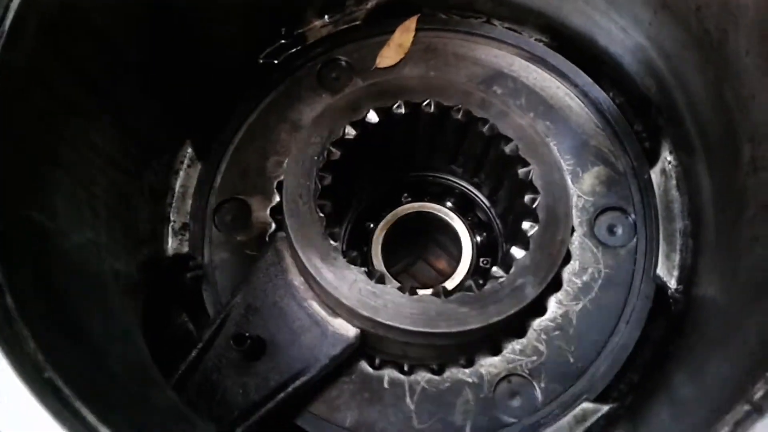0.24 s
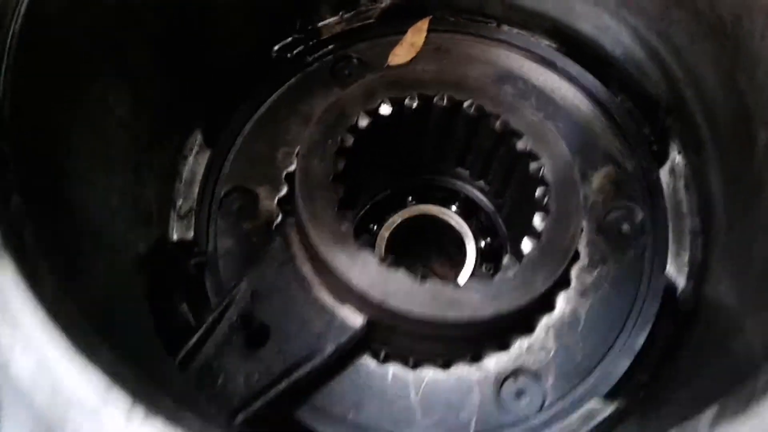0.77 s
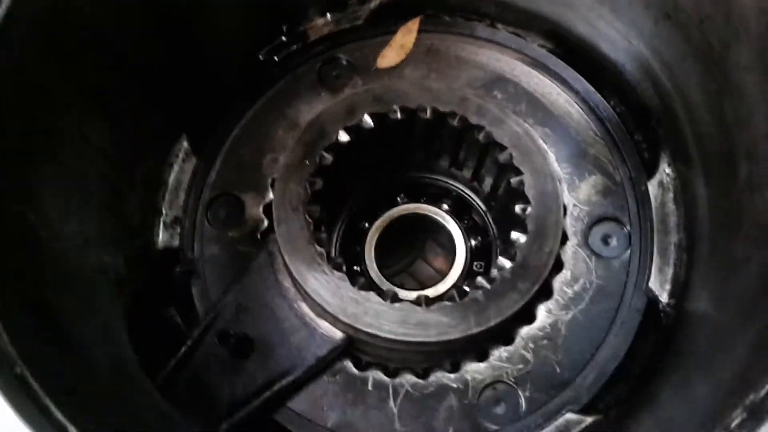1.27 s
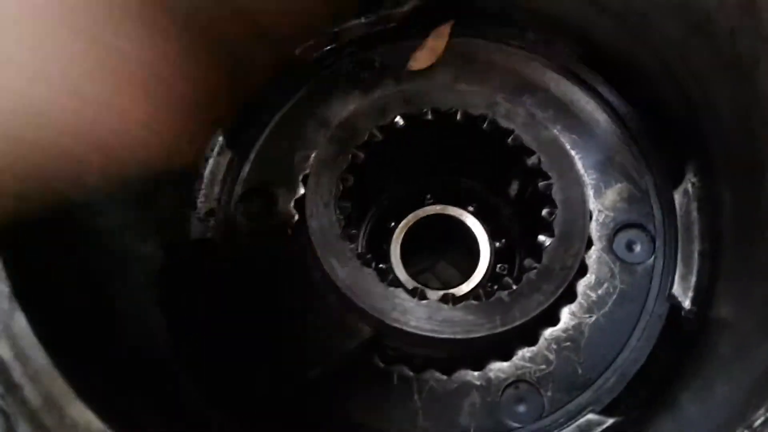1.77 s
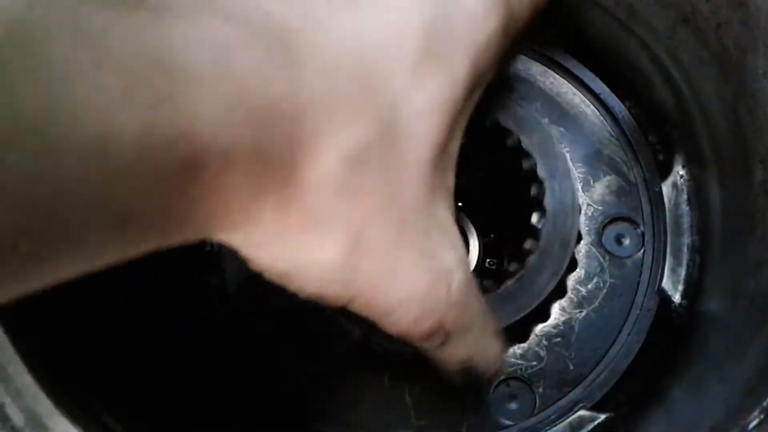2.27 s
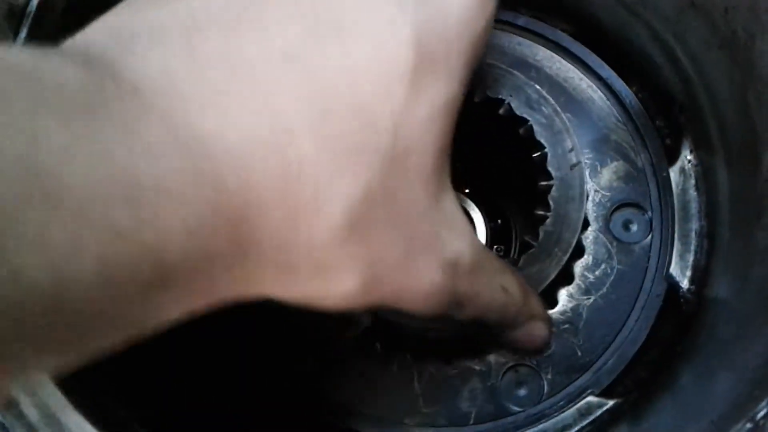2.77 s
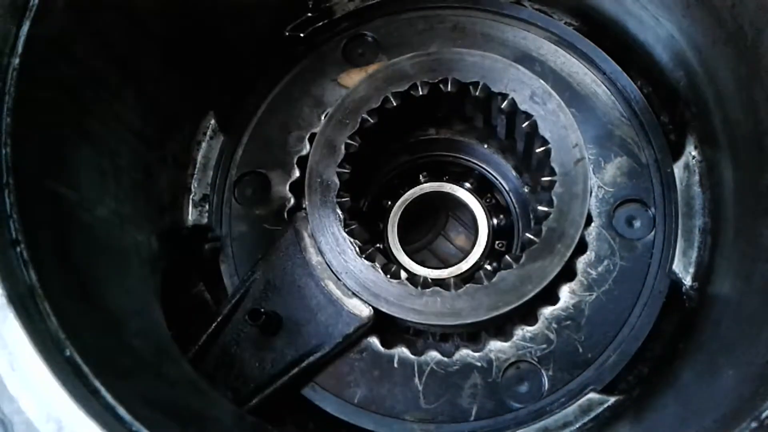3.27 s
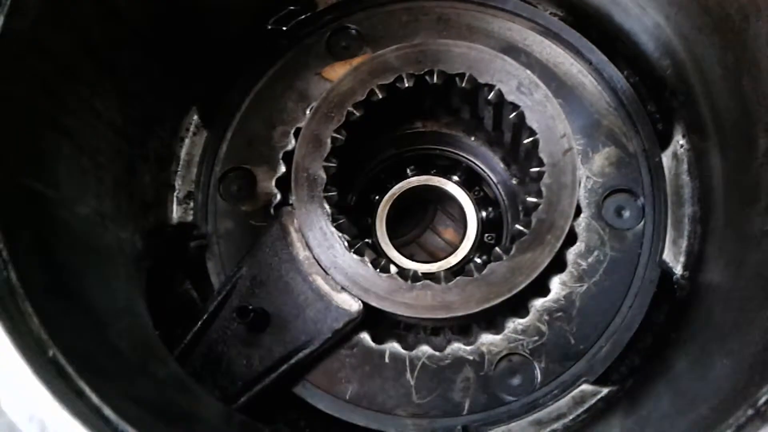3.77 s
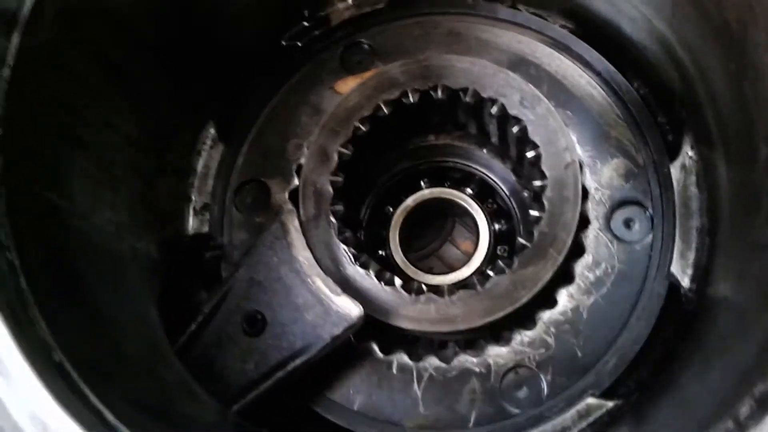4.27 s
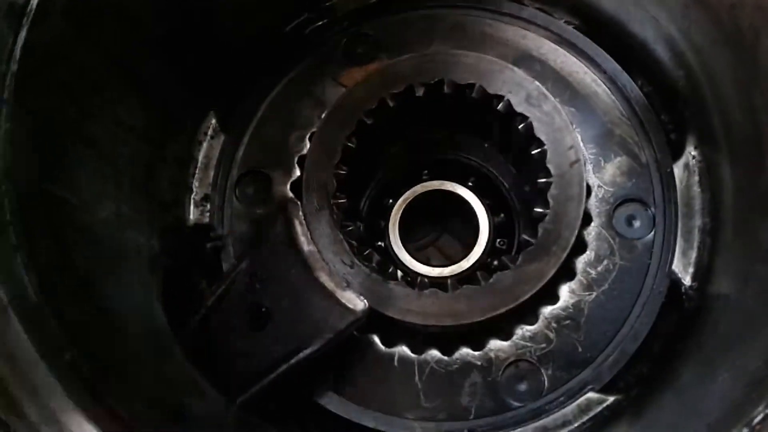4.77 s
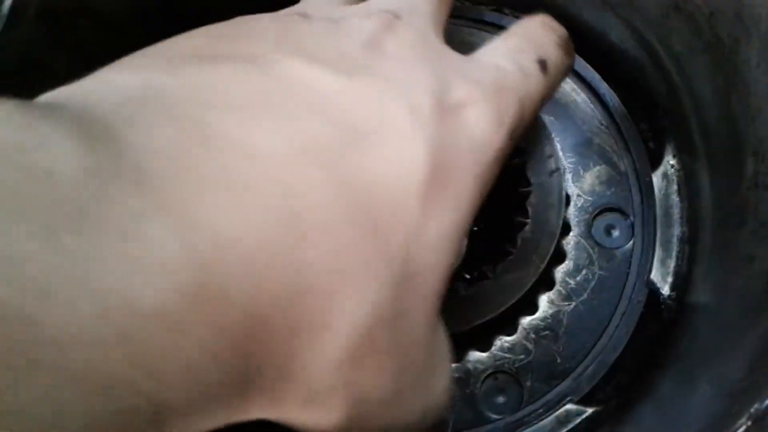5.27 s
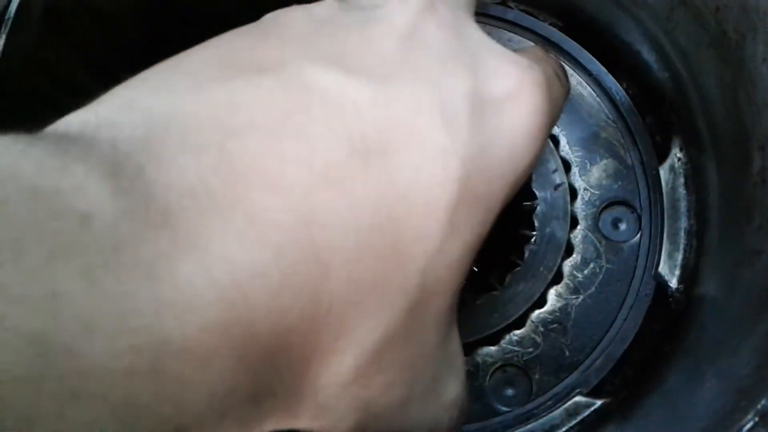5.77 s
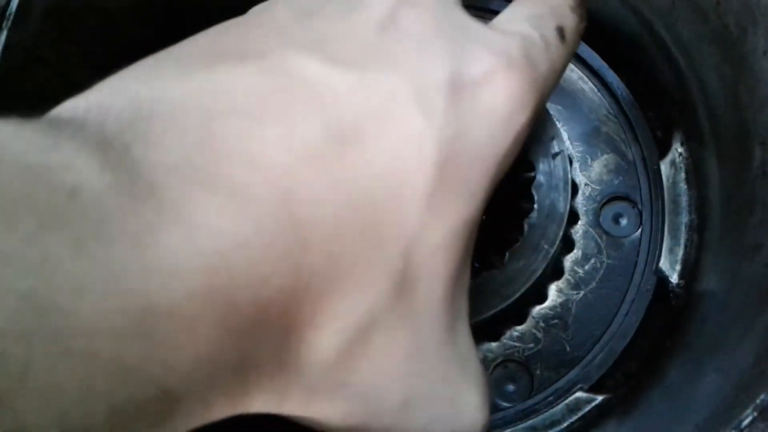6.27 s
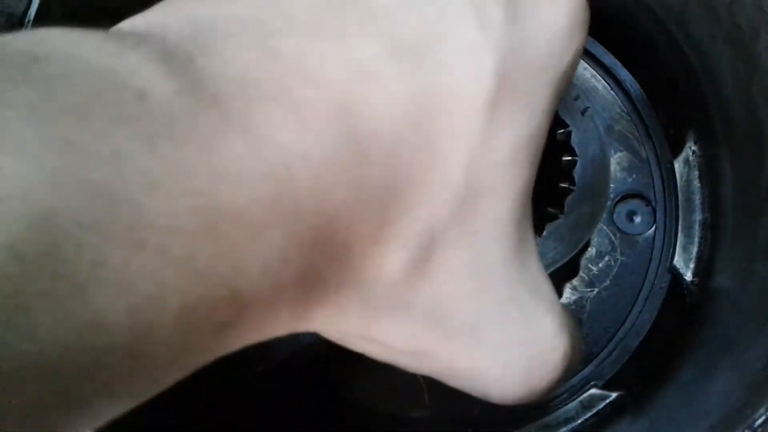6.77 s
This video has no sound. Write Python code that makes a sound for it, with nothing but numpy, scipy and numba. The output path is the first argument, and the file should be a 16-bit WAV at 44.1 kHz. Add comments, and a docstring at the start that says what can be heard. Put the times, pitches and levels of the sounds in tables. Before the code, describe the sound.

Steel gear teeth click and clank inside a deep metal casing, heard very close. Faint ticks come first, then a heavy hollow knock near one second, a bright cluster, and denser clanks as the hand turns the gear. After a pause, more hard hits follow, then sparse knocks and a final rattling flurry with a thin metallic ring. Low workshop hum and faint crickets lie behind. The right side is clear; the left is muffled, as if covered.

```python
"""Steel gear in a metal housing

A hand turns a steel gear in a deep metal housing, heard close above by two ports, the left one covered.
Teeth clink and scrape: bursts and streams of tiny contacts excite damped gear modes and a direct crack.
Softened knocks excite the deep modes of the housing; a loose ring sings as a beating group of modes.
Behind lie the filtered noise of a workshop, its hum, far crickets as throbbing tones, and port hiss.
"""
import sys
import numpy as np
from scipy import signal
from scipy.fft import rfft, irfft, next_fast_len
from scipy.io import wavfile
from scipy.ndimage import uniform_filter1d
from numba import njit

SR = 44100
rng = np.random.default_rng(int(sys.argv[2]) if len(sys.argv) > 2 else 0)


def master(y):
    """Save y as 16-bit WAV."""
    cut = np.clip(np.atleast_2d(y).T, -1, 1)
    pcm = np.round(cut * 32767)  # scale
    wavfile.write(sys.argv[1], SR, pcm.astype(np.int16))


def convert_level_to_amplitude(level_db):
    """Map a level in decibels to its linear amplitude factor."""
    exponent = np.asarray(level_db, float) / 20
    return 10 ** exponent


N = 310271

# All levels in the tables are relative; contact lengths are held to 0.3-12 ms when used.
# teeth meeting: (time [s], level [dB], tilt [dB per octave], air level [dB], chatter length [ms])
# tilt: positive is hard and bright, negative is dull
CLINKS = [(0.2606, -37.5, 4, -78, 4.6), (0.3143, -26.5, -3, -76, 14), (.3259, -24, -4.5, -64, 3.7),
          (.3324, -17.5, 3.5, -51, 4.1), (0.9574, -18, -2, -57.5, 5.4), (1.1235, -33, 1, -63.5, 1.1),
          (1.2366, -43, -9, -71, 12.5), (1.2522, -16.5, 2, -38.5, 6.8), (1.2678, -10.5, 4.5, -45, 3.8),
          (1.2786, -17.5, 0, -44, 2.3), (1.3174, -28.5, -1, -66, 2.5), (1.3384, -30, 1, -76, 0.82),
          (1.3563, -34.5, -1, -79, 1.4), (1.363, -28.5, 4.5, -79, 4.6), (1.5404, -35, -8, -67, 11),
          (2.0343, -37, -2, -56, 1.4), (2.1036, -34, 2, -62, 3), (2.1172, -32.5, 1, -52, 5.5),
          (2.2884, -31, -4, -71, 3.5), (2.3193, -18, -1.5, -51.5, 1.7), (2.3427, -42, 15, -51.5, 5.6),
          (2.4449, -6, -2, -43.5, 2.7), (2.453, -26.5, 11.5, -54, 4.5), (2.523, -9.5, 0.5, -52, 3),
          (2.5483, -9, -2.5, -47, 3.6), (2.5589, -9.5, 0.5, -58, 3.3), (2.5708, -32, 6, -54, 1.7),
          (2.6887, -12, -5, -58, 3.7), (2.7, -16, 2, -63, 4.1), (2.7248, -30.5, -9.5, -63, 1.5),
          (3.6641, -24.5, 7, -53, 0.61), (3.7033, -31, -1, -76, 7.3), (3.8721, -22.5, -4.5, -75, 3.4),
          (3.93, -5, 3, -32.5, 4.5), (3.98, -29, -1, -64, 6.3), (4.022, -33.5, 1, -81, 0.89),
          (4.221, -31, -2, -73, 6.8), (4.241, -17, -2.5, -75, 2.2), (4.2502, -20, 0.5, -72, 1.7),
          (4.3093, -7, 3, -46, 3.6), (4.3226, -10.5, 2.5, -37, 4.5), (4.5366, -31, 3, -70, 4.8),
          (4.7647, -18.5, -11.5, -59, 3.1), (4.7687, -9, -3, -90, 5), (4.787, -23.5, 1, -63, 6.1),
          (5.1581, -43, 2.5, -75, 1.7), (5.5077, -37, -1.5, -68, 2.6), (5.5682, -11, -0.5, -64, 4.2),
          (5.5792, -24.5, -2, -74, 1.1), (6.2409, -13.5, 1.5, -38.5, 3.9), (6.2862, -12.5, -0.5, -46, 1.8),
          (6.3034, -46, -1, -66, 1), (6.4772, -25, -2, -67, 6), (6.4921, -22, 0, -64, 3.2),
          (6.5116, -15.5, 1.5, -53, 1.3), (6.524, -34, -5, -65, 1.6), (6.5391, -21, -7.5, -65, 1.7),
          (6.553, -18, 1, -71, 3.3), (6.5623, -14, -2.5, -71, 6.1), (6.5734, -23.5, -2.5, -76, 3.3),
          (6.5994, -47, 1, -76, 2.8), (6.6126, -45, -8, -79, 3.8), (6.6488, -24.5, 1, -60, 0.77),
          (6.691, -45.5, -7.5, -80, 10), (6.8055, -43.5, -7, -74, 1.6), (6.812, -34, -4.5, -77, 1.3),
          (7.003, -43.5, -4.5, -73, 3.3), (7.0294, -36, -5, -74, 5.9)]
# teeth dragging over each other:
# (start [s], length [s], level [dB], tilt [dB per octave], rumble level [dB])
SCRAPES = [(1.246, 0.032, -37, 3, -32.5), (1.338, 0.03, -44.5, 6, -42.5), (2.375, 0.028, -36, -12, -27.5),
           (2.42, 0.018, -27, 3, -57), (2.518, 0.023, -51, -15.5, -32), (2.546, 0.013, -20.5, 11, -49),
           (2.689, 0.039, -32, 7, -34.5), (3.866, 0.038, -36.5, 1, -35), (3.901, 0.02, -30, -2.5, -45),
           (3.928, 0.043, -45.5, -5, -63), (5.607, 0.064, -63.5, -10.5, -48),
           (6.406, 0.13, -44.5, 0, -42.5), (6.482, 0.11, -34.5, 19, -47), (6.592, 0.038, -57, -1, -50)]
# modes of the gear: (frequency [Hz], level [dB], decay time t60 [s])
GEAR_MODES = [(698, -1, 0.014), (744, -21, 0.1), (955.7, -2, 0.03), (1146, -1, 0.027), (1293, -12.5, 0.028),
              (1603, -13.5, 0.032), (1647, -7.5, 0.029), (1819, -4.5, 0.053), (1923, -15.5, 0.076),
              (2200, -2, 0.021), (2680, -5.5, 0.029), (2910, 4, 0.012), (3198, -1, 0.038),
              (3292, 2.5, 0.036), (3385, 5.5, 0.01), (3758, -1.5, 0.032), (3993, -5, 0.1),
              (4100, -1, 0.031), (4258, 1, 0.045), (4280, 2, 0.013), (5150, -6.5, 0.024)]
# spans in which the hand turns the gear itself; at other times the blows come
# through the shaft and ring less: (start [s], end [s])
HELD_SPANS = [(2.2, 2.9), (5.3, 7.04)]
# the housing knocked: (time [s], level [dB], knock length [ms], pitch [Hz])
THUDS = [(0.068, -42.5, 3.7, 210), (0.313, -26, 2.1, 490), (0.33, -24.5, 4.1, 465),
         (0.955, -10.5, 5.1, 298), (0.961, -3, 1.87, 213), (1.267, -13, 0.84, 200),
         (1.281, -22.5, 1.5, 274), (1.294, -31, 7.9, 296), (1.54, -21, 1.8, 480), (2.028, -31.5, 4, 298),
         (2.056, -37.5, 1.7, 450), (2.219, -40, 4.1, 234), (2.267, -31.5, 5, 439), (2.286, -27, 4.3, 216),
         (2.318, -19.5, 4.8, 468), (2.441, -19.5, 8.8, 460), (2.567, -24, 3.3, 450), (2.686, -18, 3.9, 465),
         (3.448, -38, 7.4, 244), (3.661, -34.5, 7.2, 210), (3.709, -32, 2.3, 214), (3.854, -20.5, 3.8, 208),
         (3.927, -19.5, 4.7, 191), (3.961, -19.5, 3.5, 490), (4.012, -10.5, 10.4, 252),
         (4.036, -34, 5, 315), (4.24, -20, 6.3, 515), (4.317, -17, 1.8, 452), (4.341, -17, 4.5, 210),
         (4.685, -36.5, 15, 278), (4.761, -14.5, 8.6, 342), (5.155, -37, 3.7, 213), (5.207, -43, 4.3, 199),
         (5.505, -30.5, 3.8, 234), (5.567, -30, 9.3, 285), (5.767, -37.5, 1.9, 440),
         (5.844, -37.5, 6.8, 143), (6.241, -20.5, 8.1, 196), (6.287, -21, 4.1, 455), (6.306, -28, 2.8, 433),
         (6.51, -26.5, 6.5, 415), (6.56, -16, 2, 466), (6.649, -27, 2.7, 452), (6.692, -29, 2.7, 320),
         (6.802, -26, 7, 218), (7.004, -29, 4.4, 431)]
# modes of the housing: (frequency [Hz], level [dB], decay time t60 [s])
HOUSING_MODES = [(102, -10.5, 0.7), (120.8, -18.5, 0.41), (155.4, -8, 0.071), (173.4, -13, 0.12),
                 (210, 1.5, 0.11), (236, -2.5, 0.15), (285, 2, 0.092), (315, -3.5, 0.22),
                 (367.6, -3.5, 0.11), (415, 4, 0.068), (452, 3.5, 0.08), (536, -13.5, 0.26),
                 (701, -9, 0.11)]
# the loose ring struck: (time [s], level [dB], level of its high mode [dB])
RING_STRIKES = [(0.2723, -48, -84), (1.2366, -38, -86), (1.288, -53, -73), (2.291, -38, -77),
                (2.374, -30, -71), (2.4575, -33, -57), (2.5526, -47, -62), (2.6932, -42, -62.5),
                (5.5702, -12, -91), (5.8156, -46.5, -80), (5.928, -50, -84), (6.1677, -50, -89),
                (6.2455, -56, -74), (6.2892, -19.5, -66), (6.512, -34, -64), (6.541, -3.5, -79),
                (6.5514, -22, -79), (6.5811, -22, -74), (6.6478, -34, -67.5)]
# modes of the ring, the high one last: (frequency [Hz], level [dB], decay time t60 [s])
RING_MODES = [(4151.5, 0, .44), (4159.8, -6.5, .44), (4242, -18, .15), (10865, 7.5, .2)]
# fingers or teeth damp the ring: (time [s], level taken [dB])
GRIPS = [(.3, 11), (1.4, 13), (2.318, 14), (2.42, 10), (2.513, 25), (2.601, 20), (2.763, 19), (5.754, 9.5),
         (6.312, 13), (6.7, 21)]
# the rim struck: (time [s], level [dB])
RIM_STRIKES = [(1.266, -71), (3.9275, -52.5)]
# the one mode of the rim: (frequency [Hz], decay time t60 [s])
RIM_MODE = (11060, 0.31)
# response of the microphone: (frequency [Hz], gain [dB])
MIC_RESPONSE = [(20, -61), (60, -8), (110, 0.5), (4800, -2.5), (7000, -32.5), (12000, -43)]
# transfer through the covered left port: (frequency [Hz], gain [dB], phase [rad])
COVER_RESPONSE = [(40, -2.5, -.4), (90, -2, -.6), (215, -5, -1.0), (300, -7.5, -1.0), (430, -6, -.9),
                  (600, -12, -.9), (860, -19, -.9), (1200, -23, .1), (1700, -32, 1.0), (3000, -45, 1.0)]
# colour of what rattles round the cover: (frequency [Hz], gain [dB])
LEAK_COLOUR = [(100, -45), (300, -24), (600, -17), (900, -21), (1700, -29), (2400, -36), (3400, -39),
               (4300, -38), (6500, -32), (9000, -22), (15000, -14)]
# far crickets trilling: (start [s], length [s], mid-trill pitch [Hz], level [dB])
TRILLS = [(-.3, 0.79, 3630, -63), (1.7, 0.63, 3680, -48.5), (3.1, 0.71, 4040, -60.5), (3.3, .7, 3780, -61),
          (4.25, 0.42, 3710, -55), (5.15, .75, 3770, -55)]
# spectrum of the workshop air: (frequency [Hz], density [dB per Hz])
SHOP_SPECTRUM = [(18, -43.5), (30, -30), (51, -14.5), (129, -6.5), (171, -16.5), (350, -17), (386, -21.5),
                 (467, -23), (526, -24), (734, -23), (2200, -23), (4000, -22), (5320, -32.5), (9000, -54.5),
                 (11700, -72), (19800, -120)]
# self-noise of each port: (frequency [Hz], density [dB per Hz])
HISS_SPECTRUM = [(1000, -116), (4300, -118), (8000, -115), (11000, -118), (15000, -115)]
# level of shop and hiss, which steps up near the first loud blow and wavers after: (time [s], level [dB])
SWELL = [(0, -4.5), (.94, -5), (1.0, 3), (1.4, 4.5), (2.6, 5.5), (2.9, 0), (3.6, -0.5), (4.0, 3.5),
         (5.0, 4), (7.04, 2.5)]

TILT_HZ = 2800  # pivot of the spectral tilt


def teeth(drag_bright, drag_middle):
    """Impact excitation: contacts and drags feed the gear modes and radiate directly as a crack."""
    s, db, tilt_db, air_db, ms = np.transpose(CLINKS)
    blows = chatter(ms, 0.91, first=0.3)

    def tilted_db(hz):
        """Spectral tilt: the level changes by a fixed amount per octave from the pivot."""
        return db + tilt_db * np.log2(hz / TILT_HZ)

    # (low edge [Hz], high edge [Hz], blow levels [dB], drag signal)
    zones = [(468, 1900, tilted_db(837), drag_middle),
             (2233, 3460, db + 1.5, drag_bright),
             (3880, 6430, tilted_db(5500), drag_bright)]
    mode_zones = [zones[(hz > 2200) + (hz > 3500)] for hz, _, _ in GEAR_MODES]
    held = sum((a < s) & (s < b) for a, b in HELD_SPANS)
    ringing_db = np.where(held, -5, -13)
    levels_db = [zone[2] + ringing_db for zone in mode_zones]
    streams = [convert_level_to_amplitude(-22.5) * zone[3] for zone in mode_zones]
    out = body(GEAR_MODES, s, blows, levels_db, streams, scatter_db=3)
    for lo_hz, hi_hz, level_db, drag in zones:
        contacts = place(s, blows * convert_level_to_amplitude(level_db + 25.5)[:, None])
        out = out + band(contacts + convert_level_to_amplitude(-6) * drag, lo_hz, hi_hz)
    return out


def drags():
    """Sliding friction: streams of uneven contacts for the bright, middle and low part of each scrape."""
    s, length, db, tilt_db, rumble_db = np.transpose(SCRAPES)[:, :, None]
    lead_s, rise_db_s, fall_db_s = 0.04, 2504, 1208  # a drag bites, holds, lets go
    t = np.arange(SR // 4) / SR - lead_s
    bite_db = np.minimum(0, rise_db_s * t)
    release_db = np.maximum(0, fall_db_s * (t - length))
    middle_db = db + tilt_db * np.log2(1000 / TILT_HZ)
    levels = [place(s[:, 0] - lead_s, convert_level_to_amplitude(level_db + bite_db - release_db))
              for level_db in (db, middle_db, rumble_db)]
    return np.array(levels) * grit((3, N), 2.3) * convert_level_to_amplitude(2.08 * walk(120))


def housing(drag):
    """Soft impacts lack treble: dull knocks excite the casing modes, most of all those near their pitch."""
    s, db, ms, pitch_hz = np.transpose(THUDS)
    soft = signal.lfilter(np.hanning(60) / 30, 1, chatter(ms, 2.0, first=1.4))
    s = s + 0.0014  # the knocks sound 1.4 ms after their listed times
    levels_db = [db - 4.0 - 5.75 * np.abs(np.log2(hz / pitch_hz)) for hz, _, _ in HOUSING_MODES]
    rumble = convert_level_to_amplitude(-28) * band(drag, 90, 780)
    ringing = body(HOUSING_MODES, s, soft, levels_db, [rumble] * len(HOUSING_MODES), scatter_db=1.47)
    direct = band(place(s, soft * convert_level_to_amplitude(db + 34.5)[:, None]), 130, 650)
    return ringing + direct


def ring():
    """Beating: close modes of the loose ring drift in and out of phase until a grip adds damping."""
    s, low_db, high_db = np.transpose(RING_STRIKES)
    grip_s, taken_db = np.transpose(GRIPS)
    # a new blow first stills the old song
    damp_s = np.r_[grip_s, s - .005]
    damp_db = np.r_[taken_db, np.full(len(s), 12.0)]
    hold = convert_level_to_amplitude(-place(damp_s, np.outer(damp_db, np.ones(200) / 200)))  # loss spread over 200 samples
    out = []
    for k, (hz, db, t60) in enumerate(RING_MODES):
        # a smooth tap at the mode's own pitch, so the ring swells in without a click
        tap = np.hanning(100) / 25 * np.cos(2 * np.pi * hz * np.arange(100) / SR)
        strike_db = low_db if hz < 9000 else high_db
        taps = place(s, np.outer(convert_level_to_amplitude(strike_db), tap))
        out.append((-1) ** k * convert_level_to_amplitude(db) * mode(taps, float(hz), t60, hold))
    return sum(out[:-1]), out[-1]


def sparks():
    """Short contacts reach high frequencies: the thin top of the clinks, and a rim struck into song."""
    s, air_db, ms = np.transpose(CLINKS)[[0, 3, 4]]
    contacts = place(s, chatter(ms, 2.5, first=0.5) * convert_level_to_amplitude(air_db + 25.5)[:, None])
    air = shape(contacts, [(3000, -34.5), (6000, 15.5), (9000, 0.5), (12000, -10.5), (16000, -16.5)])
    s, db = np.transpose(RIM_STRIKES)
    hz, t60 = RIM_MODE
    return air + mode(place(s, convert_level_to_amplitude(db)[:, None]), float(hz), t60, np.ones(N))


def chatter(ms, spread_db, first):
    """Repeated impact: a sharp contact within a lump of tiny ones that swells and dies; energy about 1."""
    t = np.arange(1800) / SR * 1000 / np.clip(ms, .3, 12)[:, None]  # in contact lengths
    lump = grit(t.shape, spread_db) * t ** .3 * np.exp(-t ** 1.4)
    lump /= np.sqrt(np.sum(lump ** 2, axis=1, keepdims=True))
    lump[:, 12] += first
    return lump / np.sqrt(1 + first ** 2)


def grit(size, spread):
    """Surface roughness: tiny contacts of very uneven size, rms 1."""
    g = rng.standard_normal(size) * convert_level_to_amplitude(spread * rng.exponential(size=size))
    return g / np.sqrt(np.mean(g ** 2))


def body(modes, s, blows, levels_db, streams, scatter_db):
    """Modal superposition: every blow lands elsewhere and so excites another mix of the modes."""
    spot = rng.standard_normal((len(s), len(modes)))
    out = 0
    for k, (hz, db, t60) in enumerate(modes):
        gain = convert_level_to_amplitude(levels_db[k] + scatter_db * spot[:, k])[:, None]
        drive = place(s, blows * gain) + streams[k]
        out = out + (-1) ** k * convert_level_to_amplitude(db) * mode(drive, float(hz), t60, np.ones(N))
    return out


@njit
def mode(x, hz, t60, hold):
    """Damped resonance as a rotating, shrinking phasor; hold under 1 takes extra energy out."""
    pole = np.exp((2j * np.pi * hz - np.log(1000) / t60) / SR)
    z, y = 0j, np.empty(len(x))
    for i in range(len(x)):
        z = z * pole * hold[i] + x[i] + 1e-18
        y[i] = z.imag
    return y


def tail(t60, points):
    """Diffuse reverberation: exponentially decaying noise of the given colour."""
    t = np.arange(SR // 2) / SR
    return shape(rng.standard_normal(len(t)) * np.exp(-np.log(1000) * t / t60), points)


def covered(x):
    """Transmission through a cover: mostly bass, lagging in phase, plus a smeared leak round it."""
    hz, db, rad = np.transpose(COVER_RESPONSE)
    size = next_fast_len(N + 4096)
    f = np.log(np.maximum(np.fft.rfftfreq(size, 1 / SR), 1))
    gain = convert_level_to_amplitude(np.interp(f, np.log(hz), db))
    turn = np.exp(1j * np.interp(f, np.log(hz), rad))
    through = irfft(rfft(x, size) * gain * turn, size)[:N]
    leak = signal.fftconvolve(x, convert_level_to_amplitude(-17) * tail(.015, LEAK_COLOUR))[:N]
    return through + leak


def shape(x, points):
    """Minimum-phase filter from the folded cepstrum of a gain curve of (frequency [Hz], gain [dB])."""
    hz, db = np.transpose(points)
    f = np.maximum(np.fft.rfftfreq(4096, 1 / SR), 1)
    c = irfft(np.interp(np.log(f), np.log(hz), db) * np.log(10) / 20)
    c[1:2048] *= 2
    c[2049:] = 0
    return signal.fftconvolve(x, irfft(np.exp(rfft(c))))[:N]


def band(x, lo_hz, hi_hz):
    """Butterworth band-pass: a passband without ripple between two edges."""
    return signal.sosfilt(signal.butter(2, [lo_hz, hi_hz], "band", fs=SR, output="sos"), x)


def place(s, shapes):
    """Linear superposition: one row of samples is added at each time."""
    at = (np.asarray(s) * SR).astype(int)[:, None] + np.arange(shapes.shape[1])
    return np.bincount(at.ravel(), shapes.ravel(), N + shapes.shape[1])[:N]


def curve(rows):
    """Linear interpolation of table columns in time, one value per sample."""
    s, *columns = np.transpose(rows)
    return [np.interp(np.arange(N) / SR, s, c) for c in columns]


def walk(rate):
    """Low-pass random fluctuation with a spread near 1, from rate chance values a second."""
    k = int(SR / rate)
    steps = np.repeat(rng.standard_normal(N // k + 1), k)
    return 1.6 * uniform_filter1d(uniform_filter1d(steps, k), k)[:N]


def crickets():
    """Amplitude modulation: narrow throbbing tones blurred by distance, each swelling, climbing, fading."""
    t, out = np.arange(N) / SR, 0
    climb_hz_s = 101.5
    for s, length, hz, db in TRILLS:
        pulse = np.sin(2 * np.pi * 40 * t + 1.14 * walk(7.1))  # 40 Hz
        throb = np.clip(pulse + 0.33, 0, 1) * (1 + 0.76 * walk(150))
        swell = np.sin(np.pi * np.clip((t - s) / length, 0, 1)) ** 2
        pitch_hz = hz + climb_hz_s * (t - s - length / 2) + 25 * walk(10)
        out = out + convert_level_to_amplitude(db) * swell * throb * np.sin(2 * np.pi * np.cumsum(pitch_hz) / SR)
    return out


def shop():
    """Filtered noise: workshop air whose low hum wavers more than the rest."""
    air = shape(rng.standard_normal(N), SHOP_SPECTRUM) * convert_level_to_amplitude(-26.5)
    hum = band(air, 47, 330)
    return air + hum * (convert_level_to_amplitude(1.0 * walk(33)) - 1)


def hiss():
    """Self-noise: shaped noise of one port, scaled from density per Hz to full bandwidth."""
    return shape(rng.standard_normal(N), HISS_SPECTRUM) * np.sqrt(SR / 2)


def scene():
    """Superposition of dry blows, their reverberation in housing and shop, and the background."""
    bright, middle, low = drags()
    song, overtone = ring()
    steel = teeth(bright, middle) + housing(low)
    rattle = tail(0.12, [(300, -42), (700, -30), (1500, -30.0), (3000, -37.5), (5000, -35.5)])
    room = tail(0.58, [(60, -61.5), (130, -35), (300, -47), (700, -55), (3000, -84.0)])
    echoes = signal.fftconvolve(steel, rattle + room)[:N]
    # the highest parts bypass the microphone curve
    gear = shape(steel + song + echoes, MIC_RESPONSE) + overtone + sparks()
    swell = convert_level_to_amplitude(curve(SWELL)[0])
    near = gear + swell * shop() + crickets()
    noises = [hiss() * swell for _ in range(2)]
    return np.array([covered(near), near]) + noises


def top_cut(x):
    """Nothing passes above the cut-off."""
    return signal.sosfilt(signal.butter(12, 15900, fs=SR, output="sos"), x)


def record(dry):
    """Saturation: a hyperbolic tangent rounds the highest peaks."""
    mix = np.tanh(0.96 * dry) / 0.78
    return top_cut(mix)


dry = scene()
out = record(dry)
master(out)
```